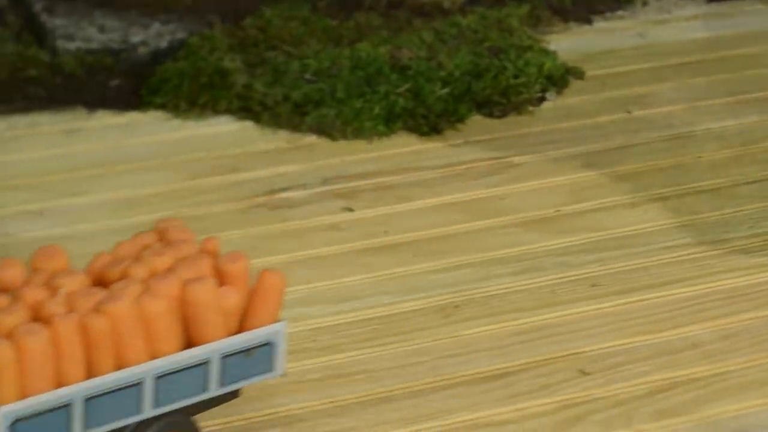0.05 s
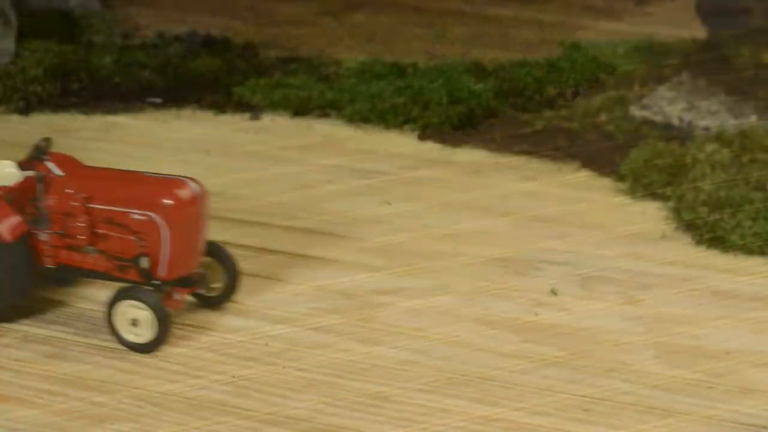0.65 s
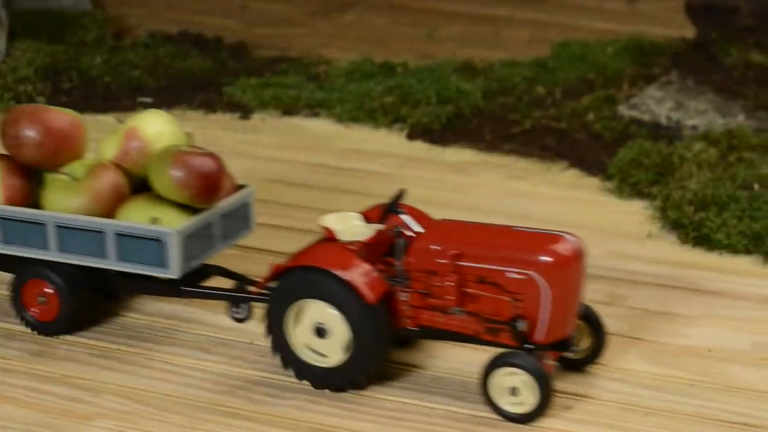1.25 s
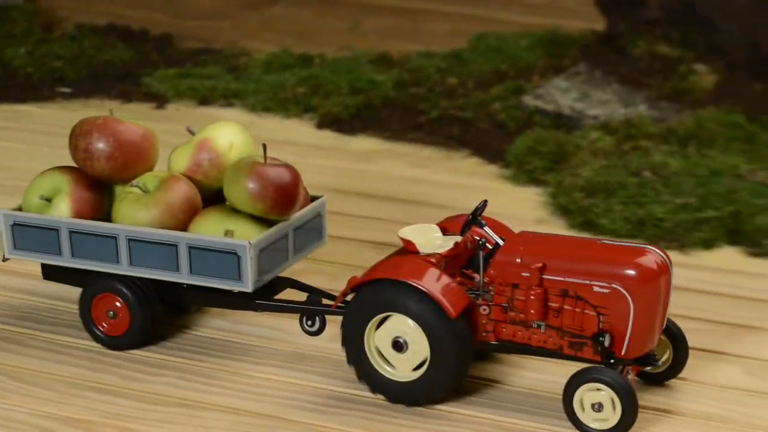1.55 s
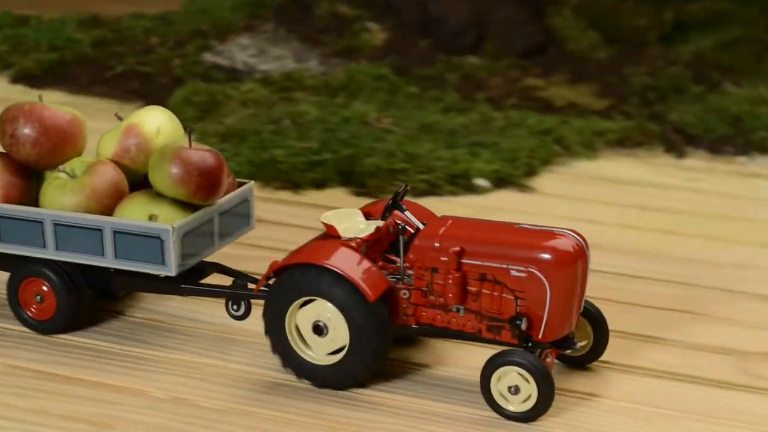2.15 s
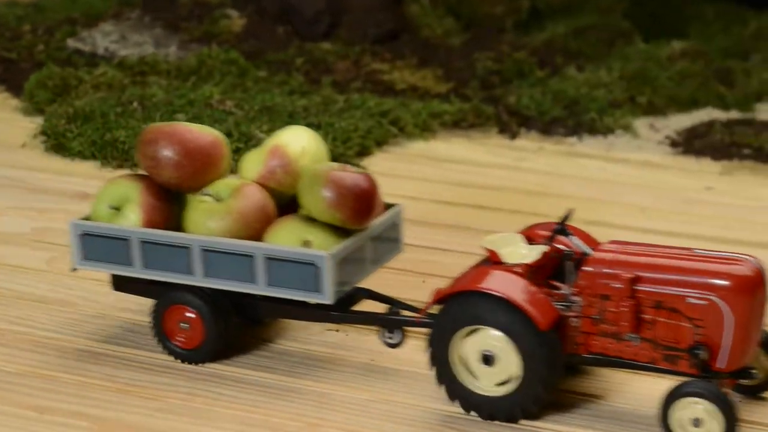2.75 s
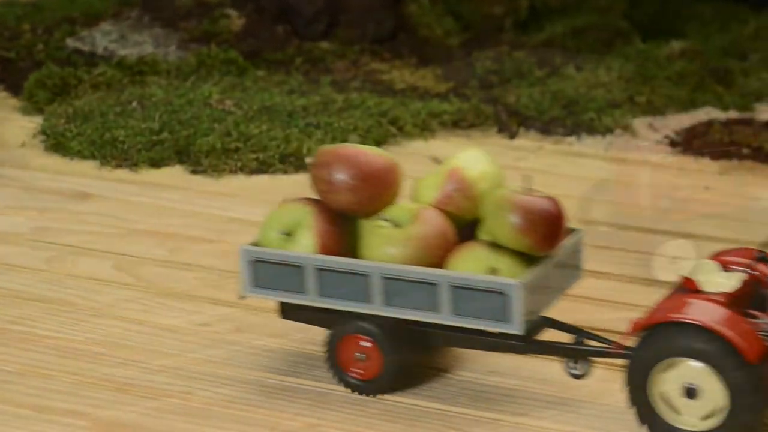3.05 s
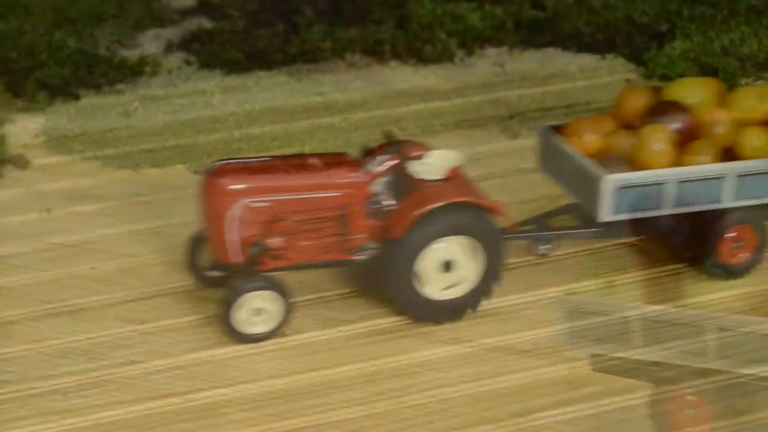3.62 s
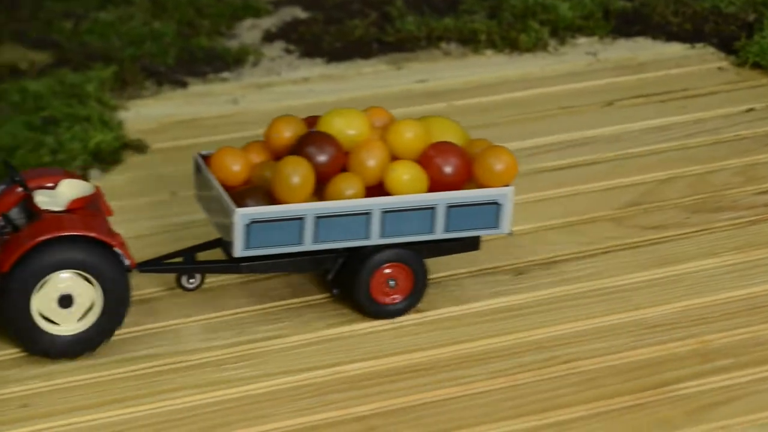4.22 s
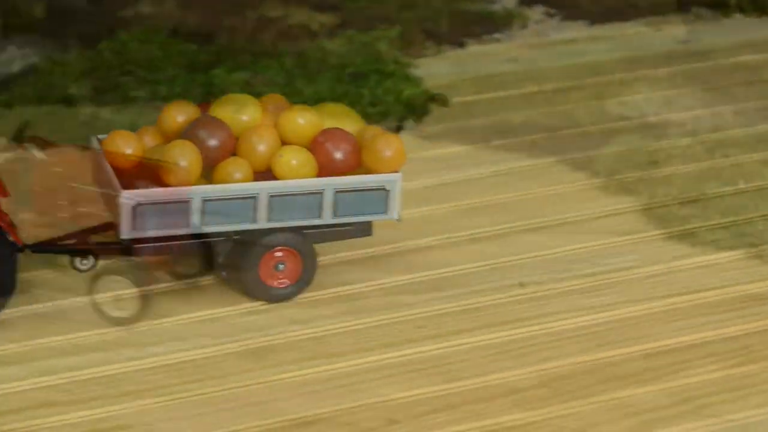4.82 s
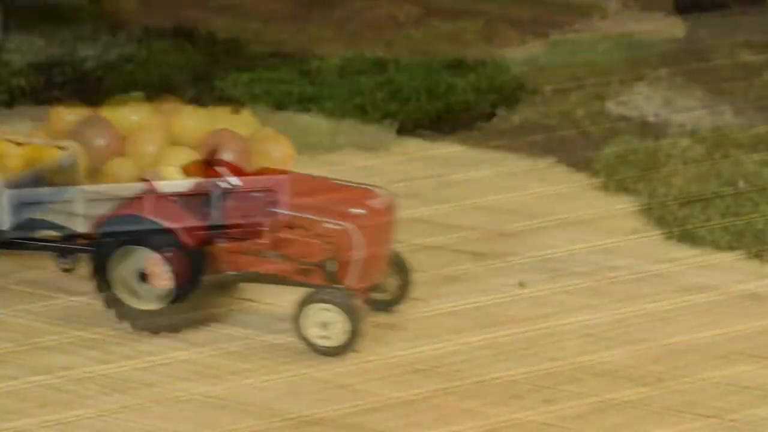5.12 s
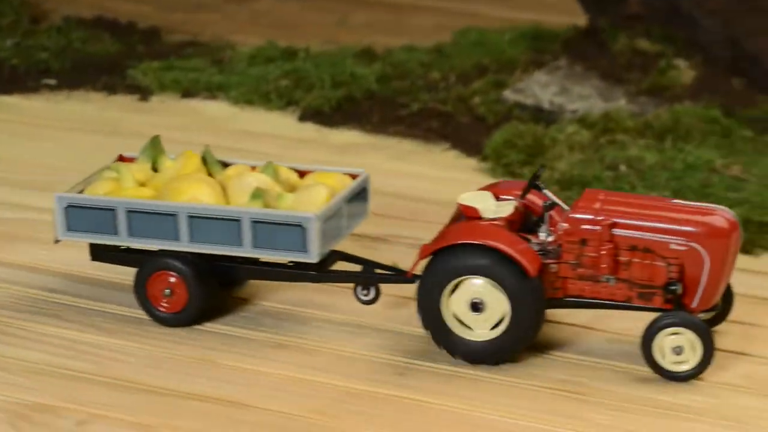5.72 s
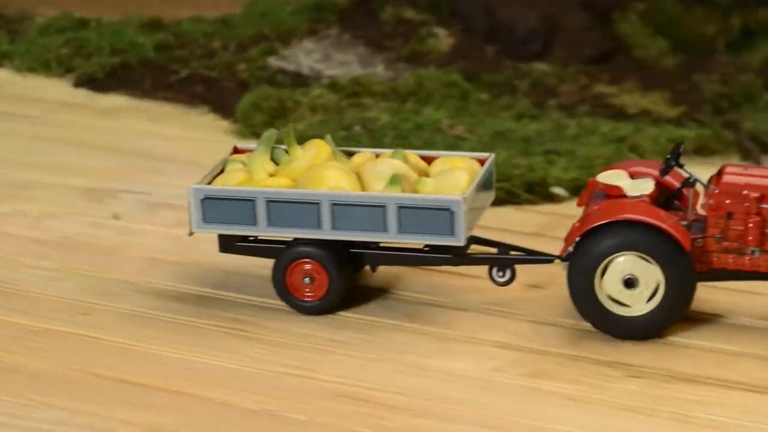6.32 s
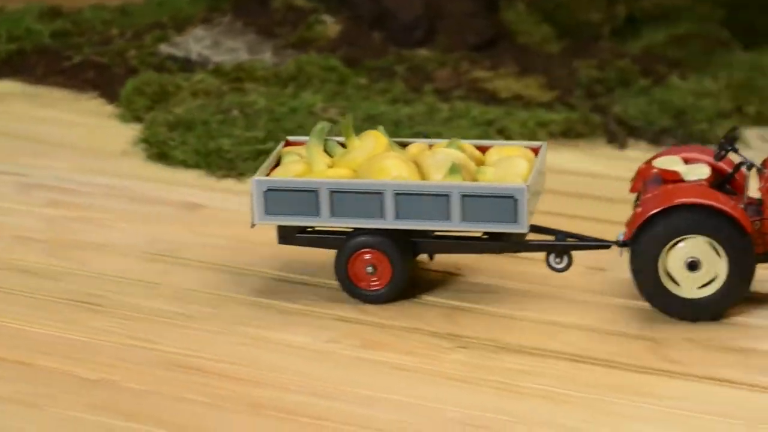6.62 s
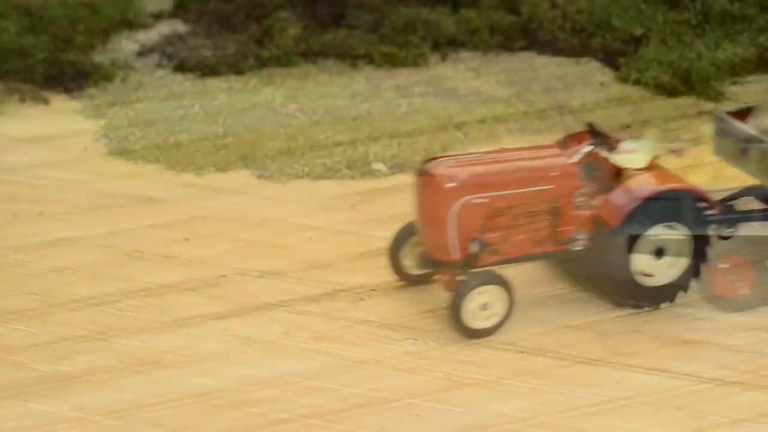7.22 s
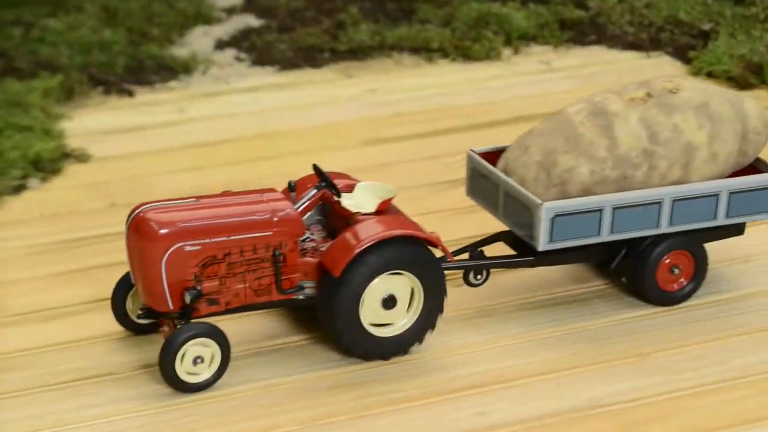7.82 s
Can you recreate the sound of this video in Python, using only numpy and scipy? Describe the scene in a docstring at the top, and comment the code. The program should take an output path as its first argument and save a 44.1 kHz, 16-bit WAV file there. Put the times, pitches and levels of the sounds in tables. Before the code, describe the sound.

A wind-up toy tractor whirrs and ratchets across a wooden tabletop, its gears chattering nonstop with a thin high tone.

```python
"""A clockwork tin tractor tows a trailer over a wooden tabletop, in five passes without a pause.
From the start its gears chatter 45-90 times a second, each beat a tiny rattle of loose parts that rings
the shell; a small steel part sings near 12.5 kHz, and the small room hums and rumbles faintly behind.
The second pass opens at 0.4 s with a brief low tone, then slows and fades as the toy rolls away.
Faster passes follow at 3.5, 5.1 and 7.2 s, the last with the hardest catch of a tooth."""
import sys
import numpy as np
from scipy import signal
from scipy.fft import rfft, irfft
from scipy.io import wavfile
from scipy.ndimage import uniform_filter1d

SR = 44100
rng = np.random.default_rng(int(sys.argv[2]) if len(sys.argv) > 2 else 0)


def dump_mix(stems):
    """Bounce the given channels to the path in sys.argv[1] as a 16-bit WAV at rate SR."""
    frames = np.atleast_2d(stems).T  # one column per channel
    limited = np.clip(frames, -1, 1)  # hard clip at full scale
    pcm = np.round(limited * 32767).astype(np.int16)
    wavfile.write(sys.argv[1], SR, pcm)


N = 355446
TIME = np.arange(N) / SR


def from_db(db):
    """Decibels to gain."""
    return 10 ** (np.asarray(db) / 20)


def unit_rms(x):
    """Scale to unit power."""
    return x / np.sqrt(np.mean(x ** 2) + 1e-20)


def slow_rms(x, span_s):
    """Running strength over several beats."""
    size = int(span_s * SR)
    return np.sqrt(uniform_filter1d(uniform_filter1d(x ** 2, size), size) + 1e-16)


def resonance(x, hz, width_hz):
    """Two-pole resonance with gain 1 at its peak."""
    r = np.exp(-np.pi * width_hz / SR)
    poles = [1, -2 * r * np.cos(2 * np.pi * hz / SR), r * r]
    return signal.lfilter(np.array([1, 0, -1]) * (1 - r * r) / 2, poles, x)


def equalise(x, curve, size=8192):
    """Minimum-phase EQ along a curve of (frequency [Hz], gain [dB])."""
    hz, db = np.transpose(curve)
    grid_hz = np.maximum(np.arange(size // 2 + 1) * SR / size, 1)
    gain = from_db(np.interp(np.log(grid_hz), np.log(hz), db))
    cepstrum = irfft(np.log(gain))
    cepstrum[1:size // 2] *= 2
    cepstrum[size // 2 + 1:] = 0
    return signal.oaconvolve(x, irfft(np.exp(rfft(cepstrum))))[:N]


def envelope(start_s, attack_s, hold_s, fall_db_per_s):
    """Attack, hold and release."""
    age = TIME - start_s
    fall_db = np.clip(fall_db_per_s * (age - attack_s - hold_s), 0, 120)
    return np.clip(age / attack_s, 0, 1) * from_db(-fall_db)


def swell(pulses, decay_s, rise_s=.00062):
    """Give each impulse a rounded attack and an exponential tail."""
    for lag_s in (decay_s, rise_s, rise_s):
        pulses = signal.lfilter([1], [1, -np.exp(-1 / (lag_s * SR))], pulses + 1e-18)
    return pulses / (rise_s * SR) ** 2


# cue for each pass: (start [s])
PASS_STARTS = [0, .428, 3.465, 5.085, 7.175]
def current_pass():
    """Index of the pass at every sample."""
    return np.searchsorted(PASS_STARTS, TIME, side="right") - 1


# EQ of the room tone: (frequency [Hz], relative level [dB])
RUMBLE_EQ = [(15, 1.5), (30, 0.5), (48, -2.5), (62, -11.5), (92, -1.5), (125, -6), (165, -10),
             (280, -11.5), (500, -13.5), (1000, -12), (4000, -62)]
def room_rumble(trim_db, base_db=-54.5, side_db=-3):
    """A wide bed of low noise."""
    mid, side = (unit_rms(equalise(noise, RUMBLE_EQ)) for noise in rng.standard_normal((2, N)))
    return from_db(base_db + trim_db) * (mid + from_db(side_db) * side * [[1], [-1]])


def sine(hz):
    """Unit-power sine at a random phase."""
    return np.sqrt(2) * np.sin(2 * np.pi * (hz * TIME + rng.random()))


# partials of the hum: (frequency [Hz], level before the trim [dB])
HUM_PARTIALS = [(32.3, -64.5), (95.5, -67.5), (118.5, -80), (236.9, -61), (333.8, -70), (474, -72),
                (543.7, -69), (710.6, -68.5)]
def room_hum(trim_db, waver=0.11):
    """Steady pitches, each wavering slightly in level."""
    knots_s = np.linspace(0, TIME[-1], 80)
    wobble = lambda: 1 + waver * np.interp(TIME, knots_s, rng.standard_normal(len(knots_s)))
    return from_db(trim_db) * sum(from_db(db) * sine(hz) * wobble() for hz, db in HUM_PARTIALS)


def low_tone(hz=173, level_db=-56):
    """One soft, brief note as the second pass opens."""
    shape = envelope(start_s=0.42, attack_s=0.032, hold_s=0.13, fall_db_per_s=110)
    return from_db(level_db) * shape * sine(hz)


def room_reverb(x, t60_s=0.27, wet_db=-9, predelay_s=.002, side_db=0.5, size=8192, hop=1536):
    """Direct sound plus a short diffuse tail; the echoes keep changing as the toy moves on."""
    age = TIME[:size]
    decay = from_db(-60 * age / t60_s) * (age > predelay_s)
    decay /= np.sqrt(np.sum(decay ** 2))
    padded = np.pad(x, (hop, 2 * hop))
    crossfade = signal.windows.cosine(2 * hop)
    wet = np.zeros((2, N + 4 * size))
    for i in range(0, N + hop, hop):
        grain = crossfade * padded[i:i + 2 * hop]
        echoes = signal.fftconvolve(grain[None], decay * rng.standard_normal((2, size)), axes=1)
        wet[:, i:i + echoes.shape[1]] += echoes
    mid, side = from_db(wet_db) * wet[:, hop:hop + N]
    return x + mid + from_db(side_db) * side * [[1], [-1]]


# live spots in the wood: (centre [s], half length [s], strength [0-1], pitch [ratio])
RINGING_SPOTS = [(0.86, 0.14, 0.5, 0.97), (1.203, 0.4, 0.7, 0.99), (4.25, .17, .4, 1.13),
                 (5.22, .17, 1.0, 1.02), (8.03, .09, 0.5, 1.01)]
def spot_weights():
    """Each spot fades in and out as the toy rolls over it."""
    return np.array([strength * np.exp(-((TIME - centre_s) / half_s) ** 2)
                     for centre_s, half_s, strength, _ in RINGING_SPOTS])


# what rings on such a spot: (base frequency [Hz], width [Hz], full boost [dB])
TABLETOP_MODES = [(2010, 150, 4.5), (2916, 130, 9), (8700, 930, 8)]
def tabletop(chatter, spots):
    """The wood rings along under the toy, tuned a little differently on each spot."""
    for weight, (*_, pitch) in zip(spots, RINGING_SPOTS):
        for hz, width_hz, boost_db in TABLETOP_MODES:
            chatter = chatter + (from_db(boost_db) - 1) * weight * resonance(chatter, pitch * hz, width_hz)
    return chatter


# square touches on the steel part: (time [s], accent level before crest and trim [dB])
STEEL_ACCENTS = [(0.1675, -29), (1.9904, -29), (3.5189, -35), (4.0871, -28), (5.9155, -30), (6.0362, -31),
                 (6.2592, -33), (6.6363, -30), (6.794, -31), (7.5976, -28), (8.0232, -23)]
def singing_steel(force, hits, chatter_db, share_db=-15, crest_db=8, trim_db=2.5, touch_spread_db=4.5):
    """A lightly damped steel part flutters with the chatter and rings out when touched squarely."""
    accents = sum(from_db(db - crest_db) * envelope(at_s, attack_s=0.0056, hold_s=0.022, fall_db_per_s=280)
                  for at_s, db in STEEL_ACCENTS)
    gain = from_db(trim_db) * np.hypot(from_db(chatter_db + share_db), accents)
    touch = from_db(touch_spread_db * rng.standard_normal(1000))[np.cumsum(hits > 0)]   # one per beat
    ring = room_reverb(resonance(force * touch, hz=12500, width_hz=62))
    return gain * ring / slow_rms(ring.mean(axis=0), span_s=0.075)


# tempo of the gears, one curve a pass: (time [s], speed [beats/s])
SPEED_CURVES = [
    [(0.0, 86.13), (0.081, 87.32), (0.348, 48.02), (0.428, 46.04)],
    [(0.428, 55.26), (1.1, 65.01), (1.246, 70.81), (1.669, 64.39), (1.774, 68.02), (2.001, 58.93),
     (2.58, 59.94), (2.704, 56.12), (2.982, 60.15), (3.465, 46.72)],
    [(3.465, 71.57), (3.817, 81.51), (3.917, 75.3), (4.212, 81.94), (4.527, 75.02), (4.653, 81.08),
     (4.735, 73.34), (5.085, 69.36)],
    [(5.085, 71.45), (5.821, 71.38), (6.13, 74.14), (6.211, 70.11), (6.634, 67.59), (6.742, 62.25),
     (7.175, 61.69)],
    [(7.175, 70.62), (7.416, 79.56), (7.519, 78.11), (7.877, 87.39), (8.06, 84.15)],
]
def spring_motor():
    """The motor surges and slows as it pulls; gives gear beats per second."""
    return np.choose(current_pass(), [np.interp(TIME, *np.transpose(curve)) for curve in SPEED_CURVES])


# lead-in to the first beat of each pass: (wait [s])
FIRST_BEAT_WAITS = [.0086, .0091, .0128, .0012, .0059]
# accents where a tooth catches hard: (time [s], target peak [dB])
TOOTH_CATCHES = [(0.2686, -21), (0.3451, -19), (0.4323, -18), (0.5467, -18), (0.6805, -16), (0.734, -17.5),
                 (1.1016, -13), (1.3473, -15), (1.379, -11), (2.224, -19), (2.2443, -15.5), (2.3123, -18),
                 (2.4074, -17.5), (2.4409, -19), (2.4778, -16.5), (2.611, -21), (2.7157, -21),
                 (2.7496, -19), (2.8225, -19), (2.8888, -25), (3.314, -23), (6.3724, -15), (7.001, -21),
                 (7.2512, -15), (7.4056, -15.5), (7.5967, -9.5), (7.976, -9)]
def gear_beats(speed, level_db, jitter_s=0.00061, lead_s=0.00043, uneven_db=1.0, crest_db=15):
    """One impulse a beat, uneven in time and force; a catching tooth hits 1-9 dB harder."""
    beat_s = []
    for k, wait_s in enumerate(FIRST_BEAT_WAITS):
        running = (current_pass() == k) & (TIME >= PASS_STARTS[k] + wait_s)
        count = np.cumsum(speed * running) / SR
        beat_s.extend(TIME[1:][np.diff(np.ceil(count)) > 0])
    force_scatter, time_scatter = rng.standard_normal((len(beat_s), 2)).T
    force_db = uneven_db * force_scatter
    beat_s = np.array(beat_s) - lead_s + jitter_s * time_scatter
    for at_s, peak_db in TOOTH_CATCHES:
        nearest = np.argmin(abs(beat_s - at_s))
        beat_s[nearest] = at_s - lead_s
        force_db[nearest] = np.clip(peak_db - level_db[int(at_s * SR)] - crest_db, 1, 9)
    hits = np.zeros(N)
    hits[np.clip(beat_s * SR, 0, N - 1).astype(int)] = from_db(force_db)
    return hits


def loose_parts(hits, contacts_per_s=7000, spread_db=2.1, rub_db=-6, low_cut_hz=2800, settle_db=-9.5):
    """Each beat throws light parts into a burst of hard contacts with little bass; then they settle."""
    sizes = from_db(spread_db * rng.standard_normal(N)) * rng.choice([-1, 1], N)
    ticks = unit_rms(sizes * (rng.random(N) < contacts_per_s / SR))
    contacts = ticks + from_db(rub_db) * rng.standard_normal(N)
    rattle = signal.lfilter(*signal.butter(1, low_cut_hz, "high", fs=SR), contacts)
    burst = swell(hits, decay_s=0.00057)
    settling = from_db(settle_db) * swell(hits, decay_s=0.0064)
    return (burst + settling) * rattle


def meshing_teeth(hits, gain_db=-17, high_cut_hz=2600, drag=2.27):
    """A duller, more even rub under the rattle; the teeth press alike on every beat."""
    rub = signal.lfilter(*signal.butter(1, high_cut_hz, fs=SR), rng.standard_normal(N))
    pressure = 1 + drag * swell(np.sign(hits), decay_s=0.0048)
    return from_db(gain_db) * pressure * rub


# tin voice of the shell and gear case: (frequency [Hz], width [Hz], average boost [dB])
SHELL_MODES = [(820, 50, 4.5), (1070, 130, 3.5), (1309, 146, 5), (1472, 68, 3), (1930, 360, 3.5),
               (2392, 40, 3), (2967, 490, 5), (4133, 460, 6.5), (4790, 340, 5.5), (5275, 250, 6.5),
               (5710, 300, 5), (6237, 380, 9), (7420, 325, 7), (8730, 950, 1), (10400, 122, 2.5),
               (11900, 1600, 4)]
def tin_shell(force, hits, spread_db=1.62):
    """Each beat strikes the modes of the shell in a new mix."""
    beat_index = np.cumsum(hits > 0)
    for hz, width_hz, boost_db in SHELL_MODES:
        strength = from_db(boost_db + spread_db * rng.standard_normal(1000))[beat_index]
        force = force + resonance((strength - 1) * force, hz, width_hz)
    return force


# resonances that stand out, one list a pass: (frequency [Hz], width [Hz], boost [dB])
FACING_PEAKS = [
    [(5700, 700, 2)],
    [(818, 65, 7.5), (1670, 300, 3), (4850, 600, 1)],
    [(1363, 40, 4.5), (2130, 190, 1.5), (4200, 140, 2), (5310, 130, 1.5)],
    [(564, 61, 6), (1090, 60, 4), (1830, 160, 1.5), (2390, 70, 2), (3100, 150, 1.5), (4200, 180, 2),
     (6350, 350, 3)],
    [(830, 60, 3), (2100, 200, 2), (2900, 230, 2), (5560, 900, 3)],
]
# tone of the side facing the listener on each pass: (frequency [Hz], relative level [dB])
FIRST_EQ = [(150, -22), (450, -18.5), (700, -14), (1000, -9), (1400, -6.5), (2100, -1.5), (3500, -6),
            (5500, -8), (8300, -9), (11800, -7), (15500, -14)]
SECOND_EQ = [(150, -20), (450, -20.5), (700, -12), (1000, -9.5), (1400, -6), (2100, -2), (3500, -6),
             (5500, -8.5), (8300, -6.5), (11800, -6), (15500, -9.5)]
THIRD_EQ = [(150, -34.5), (450, -19.5), (700, -14.5), (1000, -5), (1400, -4), (2100, 0), (3500, -6),
            (5500, -8.5), (8300, -4), (11800, -2.5), (15500, -6.5)]
FOURTH_EQ = [(150, -23.5), (450, -15.5), (700, -14), (1000, -7.5), (1400, -3), (2100, 1), (3500, 0),
             (5500, -4.5), (8300, 0), (11800, 1), (15500, -1.5)]
FIFTH_EQ = [(150, -33), (450, -22.5), (700, -13.5), (1000, -6), (1400, -9.5), (2100, -1.5), (3500, -3.5),
            (5500, -6.5), (8300, -2.5), (11800, -0.5), (15500, -5)]
def facing_side(chatter):
    """Each pass turns another side of the shell to the listener."""
    current = current_pass()
    for k, peaks in enumerate(FACING_PEAKS):
        for hz, width_hz, boost_db in peaks:
            ring = resonance(chatter, hz, width_hz)
            chatter = chatter + (from_db(boost_db) - 1) * (current == k) * ring
    curves = [FIRST_EQ, SECOND_EQ, THIRD_EQ, FOURTH_EQ, FIFTH_EQ]
    return sum(unit_rms(equalise(chatter, curve)) * (current == k) for k, curve in enumerate(curves))


def roll_by(chatter, level_db, hollow_db, bright_db):
    """Ride three bands so the chatter swells, and turns hollower or brighter, as the toy rolls by."""
    def ride(part, sense_hz, offset_db):
        bandpass = signal.butter(4, sense_hz, "band", fs=SR, output="sos")
        sidechain = signal.sosfilt(bandpass, chatter.mean(axis=0))
        return part * from_db(level_db + offset_db) / slow_rms(sidechain, span_s=0.13)

    lows, lows_and_mids = (signal.sosfiltfilt(signal.butter(3, hz, fs=SR, output="sos"), chatter)
                           for hz in (2500, 7800))
    return (ride(lows, (600, 2500), hollow_db)
            + ride(lows_and_mids - lows, (2500, 7800), 0)
            + ride(chatter - lows_and_mids, (7800, 12000), bright_db))


# mix of each pass: (closest approach [s], base level [dB], speed-to-amplitude exponent [-],
# hollow lows [dB], bright highs [dB], hum trim [dB], rumble trim [dB])
PASS_MIX = [(0.2, -35.5, 1.43, -5, -4, -22, -4), (1.3, -34, 1.74, -5, -4.5, -2.5, 0.5),
            (4.1, -34.5, 2.15, -5, -4.3, -20, -3.5), (5.45, -33.0, 2, -6, -5, -1.5, -0.1),
            (7.8, -33.5, 1.65, -6.5, -5, -23, -4.5)]
def scene(usual_beats_per_s=70, half_power_s=2.4):
    """The toy is louder when fast, fainter and thinner as it rolls away, brighter on a ringing spot."""
    mix = np.array(PASS_MIX)[current_pass()].T
    closest_s, base_db, exponent, hollow_db, bright_db, hum_db, rumble_db = mix
    speed, spots = spring_motor(), spot_weights()
    on_spot = spots.sum(axis=0)
    effort_db = exponent * 20 * np.log10(speed / usual_beats_per_s)
    distance_db = -10 * np.log10(1 + ((TIME - closest_s) / half_power_s) ** 2)
    level_db = base_db + effort_db + distance_db + 0.6 * on_spot
    hits = gear_beats(speed, level_db)
    force = loose_parts(hits) + meshing_teeth(hits)
    chatter = tabletop(tin_shell(force, hits), spots)
    chatter = room_reverb(facing_side(chatter))
    gears = roll_by(chatter, level_db, hollow_db + 0.7 * distance_db, bright_db + 3 * on_spot)
    steel = singing_steel(force, hits, level_db)
    return gears + steel + room_hum(hum_db) + low_tone() + room_rumble(rumble_db)


def record(dry):
    """A steep high cut at 15.9 kHz."""
    return signal.sosfilt(signal.ellip(12, .1, 80, 15900, fs=SR, output="sos"), dry)


dry = scene()
out = record(dry)
dump_mix(out)
```